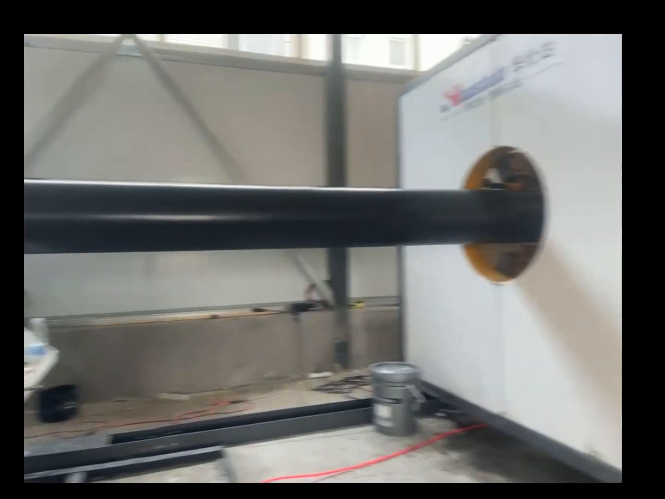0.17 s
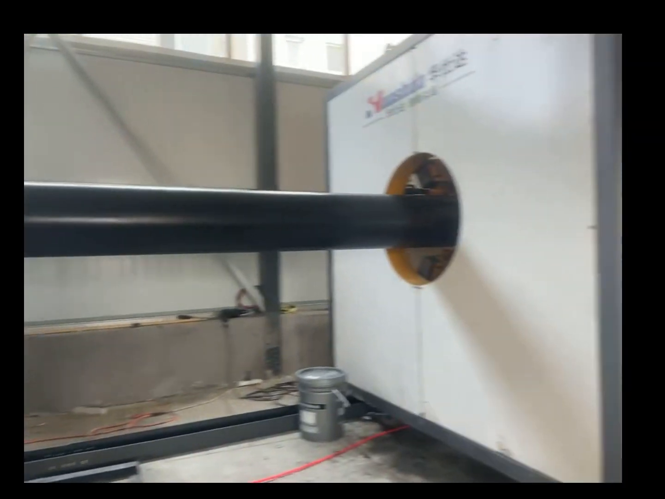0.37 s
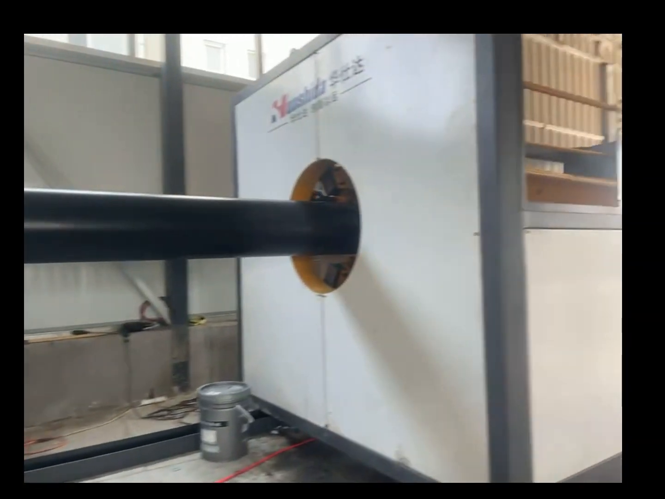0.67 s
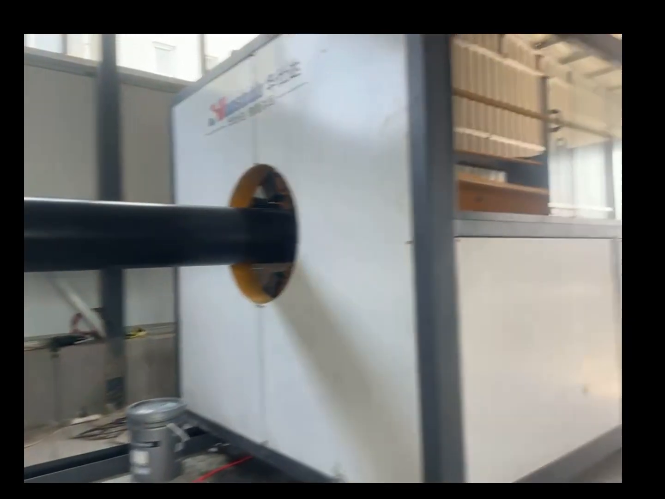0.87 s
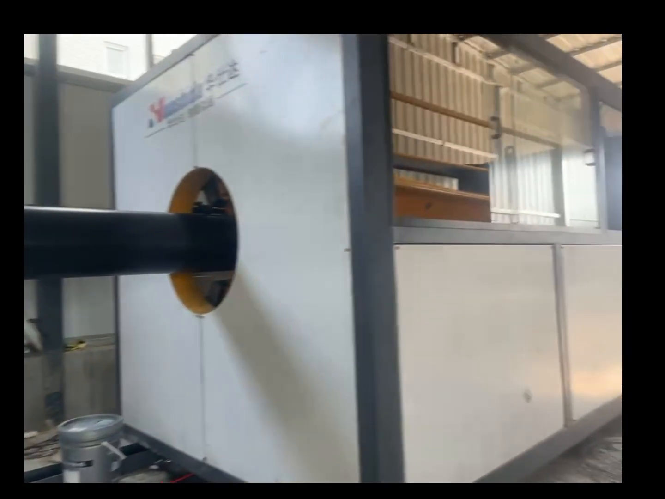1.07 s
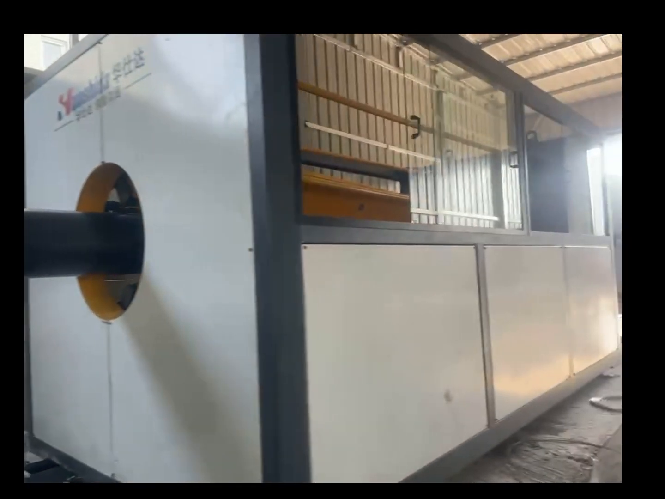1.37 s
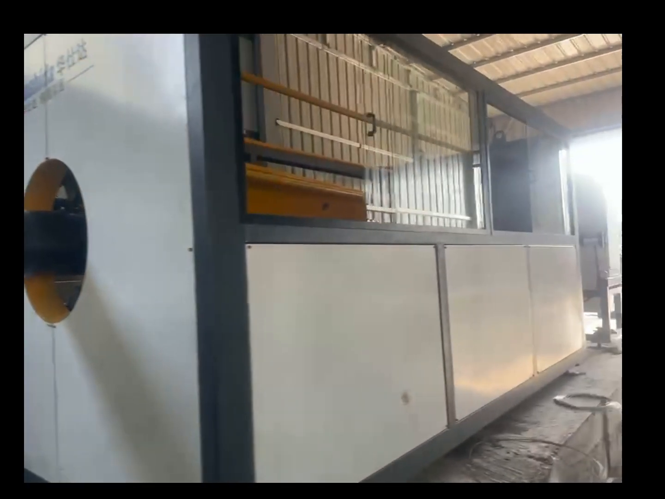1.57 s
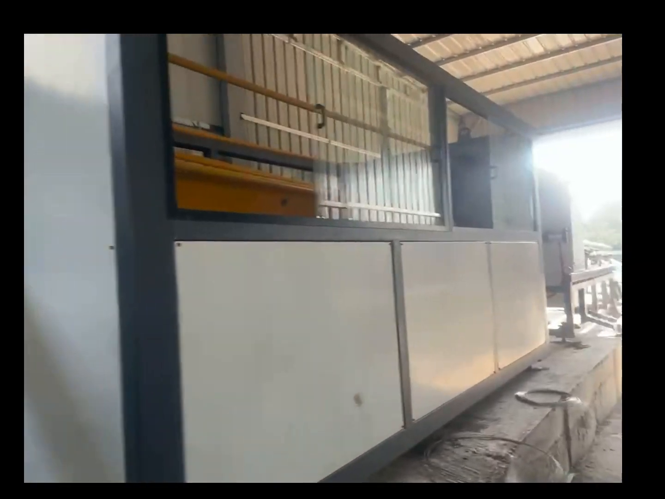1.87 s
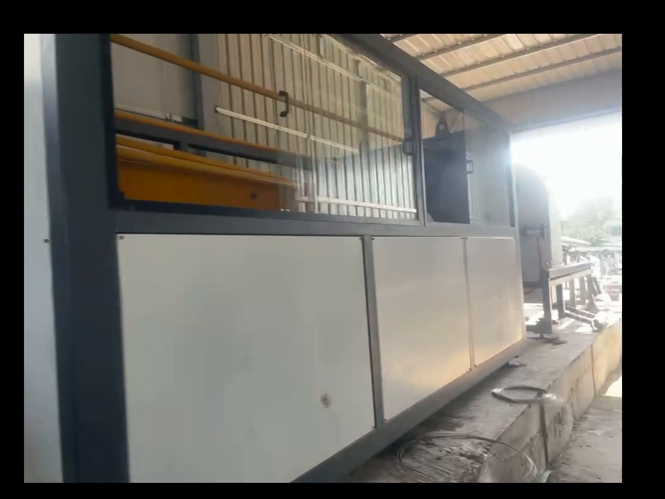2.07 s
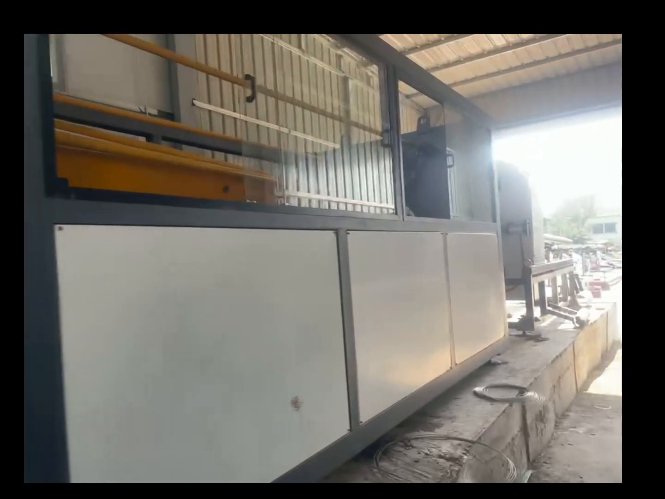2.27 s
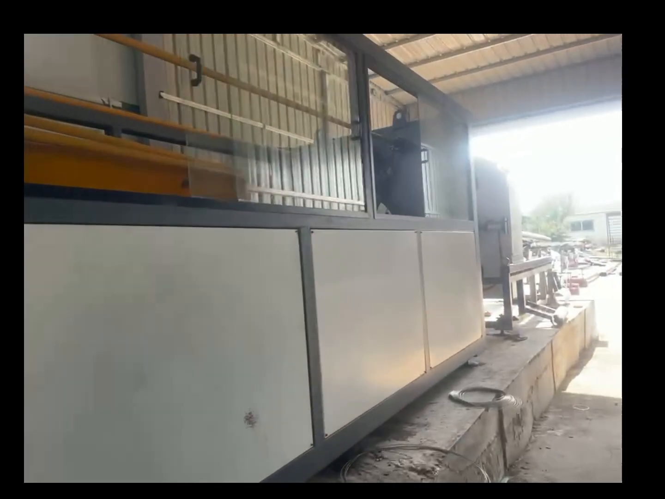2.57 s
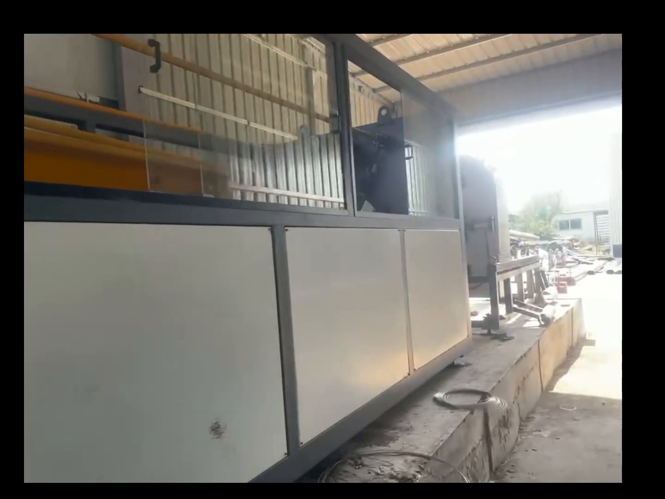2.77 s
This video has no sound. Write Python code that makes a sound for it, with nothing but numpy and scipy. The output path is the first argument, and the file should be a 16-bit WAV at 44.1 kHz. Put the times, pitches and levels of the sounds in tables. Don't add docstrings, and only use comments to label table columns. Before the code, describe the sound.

Constant loud machinery roar from 0 to 2.9 seconds: rumbling blowers, rushing ducts and hissing cooling spray in a metal shed. Through it run buzzy drive whines around 2 kHz, beating motor tones near 1.4 kHz, low mains hum and faint pipe whistles. From about 1.2 seconds a pump hum near 365 Hz grows, swelling around 1.7, easing by 2.4, then returning. Near-mono camera microphone, dull top, gritty broken treble.

```python
import sys
import numpy as np
from scipy import signal
from scipy.fft import rfft, irfft
from scipy.io import wavfile
from scipy.ndimage import uniform_filter1d, map_coordinates

SR = 44100
rng = np.random.default_rng(int(sys.argv[2]) if len(sys.argv) > 2 else 0)


def voltage_ratio(level):
    return 10 ** (np.asarray(level, float) / 20)


def master_out(mix):
    frames = np.transpose(np.atleast_2d(mix))
    ceiling = np.clip(frames, -1, 1)
    pcm = np.round(ceiling * 32767).astype(np.int16)
    wavfile.write(sys.argv[1], SR, pcm)


N = 128331

# [t/s, level/dB]
ROAR_LEVEL = [
    (0.0, -30.5),
    (0.01, -34.5),
    (0.32, -35),
    (2.9, -35.5),
    (2.91, -35),
]
# [f/Hz, level/dB]
RUMBLE_SPECTRUM = [(15, -57), (25, -32), (50, -13.5), (100, -3), (140, -0.5), (280, -2), (400, -4.5),
                   (500, -13)]
# [f/Hz, level/dB]
DUCT_SPECTRUM = [(400, -23), (470, -6.5), (620, 0.5), (705, -1.5), (800, -9), (890, -2.5), (1500, -8),
                 (1800, -13)]
# [f/Hz, level/dB]
CASING_SPECTRUM = [(1400, 0), (1680, -1.5), (2050, 0.5), (2400, -0.5), (2700, -6), (2900, -16)]
# [f/Hz, level/dB]
SPRAY_SPECTRUM = [(1530, -58), (2600, -2.5), (3090, 0.5), (3380, -3.5), (4040, -2.5), (4230, -3),
                  (6370, -9.5), (8390, -11.5), (12000, -17), (15600, -60), (22000, -120)]
# [f/Hz, level/dB]
MIST_SPECTRUM = [(11500, -24), (12000, 4), (12800, -3), (13600, -5), (13900, -1), (14200, -3)]
SWITCH_HZ = [1997.0, 1998.2, 1999.2, 2001.3, 2002.3, 2003.4]
SIDEBAND_ORDERS = [-15, -11, -9, -7, -5, -3, -1, 1, 3, 5, 7, 9, 11, 13, 15, 17, 19, 23, 31, 35]
SIDEBAND_DB = [-52, -55, -45, -59, -44, -36, -44.5, -40.5, -35, -43, -48, -44.5, -50.5, -54, -54, -53, -55,
               -49.5, -55, -56]
DOUBLE_ORDERS = [-2, 0, 2]
DOUBLE_DB = [-51, -54.5, -59]
SLOT_HZ = [1366.42, 1368.12, 1369.11, 1372.87, 1374.6, 1376.39]
SLOT_DB = [-46.5, -46.5, -41.5, -38, -43, -44]
SLOT_SIDE_HZ = [-197, -100, 22, 100]
SLOT_SIDE_DB = [-21, -10, -19, -27]
VANE_HZ = [364.9, 367.1]
# [t/s, level/dB]
VANE_LEVEL = [
    (0, -48),
    (1.05, -48),
    (1.18, -38),
    (1.4, -41),
    (1.7, -37),
    (2.4, -44),
    (2.91, -39),
]
HUM_HZ = [100, 121.6, 122.4, 142, 198, 249, 294.2, 300.8, 403, 498.4]
HUM_DB = [-44, -47, -47, -56.5, -50.5, -49, -53, -48, -53.5, -55.5]
PIPE_HZ = [598, 624, 652, 678, 703, 883]
PIPE_DB = [-53, -50, -53, -54, -52, -57]
# [f/Hz, threshold/sigma]
GAP_THRESHOLD = [(4500, -2.6), (6000, -2), (12000, -1.9), (12500, -.2), (13000, .7), (13500, 1.6),
                 (13700, .7), (13850, -1.1)]
# [t/s, low f/Hz, high f/Hz, level/dB]
FLECKS = [
    (.252, 4130, 5160, -46),
    (1.155, 5650, 7560, -48),
    (1.365, 4600, 5660, -47),
    (2.09, 5700, 6840, -51),
]


def unit(x):
    return x / np.sqrt(np.mean(x ** 2) + 1e-20)


def curve(rows):
    return np.interp(np.arange(N) / SR, *np.transpose(rows))


def wobble(rate_hz, count=1):
    knots = rng.standard_normal((count, 60))
    at = np.arange(0, N, 32) * rate_hz / SR
    curves = [map_coordinates(k, [at], mode="mirror").astype("f4") for k in knots]
    return np.repeat(curves, 32, axis=1)[:, :N]


def tones(hz, db, fade_db, fade_hz, in_step_s=None):
    hz = np.ravel(hz)[:, None]
    db = np.ravel(db)[:, None].astype("f4")
    start = rng.random(hz.shape) if in_step_s is None else -hz * in_step_s
    turns = (hz * np.arange(N) / SR + start) % 1
    gain = voltage_ratio(db + fade_db * wobble(fade_hz, count=len(hz)))
    return np.sqrt(2) * (gain * np.sin(2 * np.pi * turns.astype("f4"))).sum(0)


def rush(spectrum, patchy_db):
    _, _, z = signal.stft(rng.standard_normal(N), SR, nperseg=512)
    field = uniform_filter1d(rng.standard_normal(z.shape), size=5, axis=0)
    field = uniform_filter1d(field, size=10, axis=1)
    x = signal.istft(z * voltage_ratio(patchy_db * unit(field)), SR, nperseg=512)[1][:N]
    f, db = np.transpose(spectrum)
    bins_hz = np.fft.rfftfreq(len(x), 1 / SR)
    shape_db = np.interp(np.log(bins_hz + 1), np.log(f + 1), db, -120, -120)
    return unit(irfft(rfft(x) * voltage_ratio(shape_db), len(x)))


def roar():
    layers = voltage_ratio(2) * rush(RUMBLE_SPECTRUM, patchy_db=0.95)
    layers += voltage_ratio(1.5) * rush(DUCT_SPECTRUM, patchy_db=0.36)
    layers += voltage_ratio(-1.5) * rush(CASING_SPECTRUM, patchy_db=-0.2)
    layers += voltage_ratio(0.5) * rush(SPRAY_SPECTRUM, patchy_db=0.62)
    layers += voltage_ratio(-21 + 1.5 * wobble(5.5)[0]) * rush(MIST_SPECTRUM, patchy_db=6.0)
    return voltage_ratio(curve(ROAR_LEVEL) + 0.24 * wobble(7.76)[0]) * layers


def drives():
    feed_hz = 17.95
    share_db = -10 * np.log10(len(SWITCH_HZ))
    out = 0
    for switch_hz in SWITCH_HZ:
        sideband_hz = switch_hz + feed_hz * np.array(SIDEBAND_ORDERS)
        double_hz = 2 * switch_hz + feed_hz * np.array(DOUBLE_ORDERS)
        out = out + tones(sideband_hz, np.add(SIDEBAND_DB, share_db), fade_db=3, fade_hz=1.5)
        out = out + tones(double_hz, np.add(DOUBLE_DB, share_db), fade_db=3, fade_hz=1.5)
    return out


def motors():
    side_hz = np.add.outer(SLOT_HZ, SLOT_SIDE_HZ)
    side_db = np.add.outer(SLOT_DB, SLOT_SIDE_DB)
    sides = tones(side_hz, side_db, fade_db=2.4, fade_hz=1.3)
    return sides + tones(SLOT_HZ, SLOT_DB, fade_db=1.1, fade_hz=1.2, in_step_s=1.116)


def pumps():
    return voltage_ratio(curve(VANE_LEVEL)) * tones(VANE_HZ, [0, -7], fade_db=1.5, fade_hz=5, in_step_s=1.68)


def hums_and_pipes():
    hums = tones(HUM_HZ, HUM_DB, fade_db=4.0, fade_hz=3.06)
    return hums + tones(PIPE_HZ, PIPE_DB, fade_db=6, fade_hz=3.97)


def scene():
    return np.tile(roar() + drives() + motors() + pumps() + hums_and_pipes(), (2, 1))


def ragged_treble(x, size=1024, count=8):
    full_until_s, full_sigma = 0.55, 0.7
    faint_share, faint_above_hz = 0.45, 4500
    n = np.arange(2 * size)
    window = np.sin(np.pi * (n + 0.5) / (2 * size))
    basis = np.cos(np.pi / size * np.outer(np.arange(size) + 0.5, n + 0.5 + size / 2)) * window
    frames = N // size + 2
    lines = np.pad(x, (size, 2 * size))[np.arange(frames)[:, None] * size + n] @ basis.T

    chance = uniform_filter1d(rng.standard_normal((frames, size // count)), size=2, axis=1)
    spells = unit(uniform_filter1d(rng.standard_normal((frames, 1)), size=3, axis=0))
    chance = 0.9 * unit(chance + 0.4 * np.roll(chance, 1, axis=0)) + 0.3 * spells
    chance = chance + full_sigma * (np.arange(frames)[:, None] < full_until_s * SR / size)
    cell_hz = (np.arange(size // count) + 0.5) * count * SR / (2 * size)
    kept = chance > np.interp(cell_hz, *np.transpose(GAP_THRESHOLD), left=-9)

    faint = abs(lines) < faint_share * uniform_filter1d(abs(lines), size=32, axis=1)
    treble = np.arange(size) > faint_above_hz * 2 * size / SR
    lines = np.where(faint & treble, 0, lines)
    halves = (lines * np.repeat(kept, count, axis=1)) @ basis * 2 / size
    return (halves[1:, :size] + halves[:-1, size:]).ravel()[:N]


def side_flecks():
    out, n = np.zeros(N), round(0.046 * SR)
    hz = np.fft.rfftfreq(n, 1 / SR)
    swell = np.sin(np.pi * np.arange(n) / n)
    for t, low_hz, high_hz, db in FLECKS:
        band = irfft(rfft(rng.standard_normal(n)) * (hz > low_hz) * (hz < high_hz), n)
        out[round(t * SR) - n // 2:][:n] += voltage_ratio(db) * unit(band) * swell
    return out


def top_cut(x):
    return signal.sosfilt(signal.butter(12, 14120, fs=SR, output="sos"), x)


def record(dry):
    mix = ragged_treble(dry[0]) + np.outer([1, -1], side_flecks())
    return top_cut(mix)


dry = scene()
out = record(dry)
master_out(out)
```